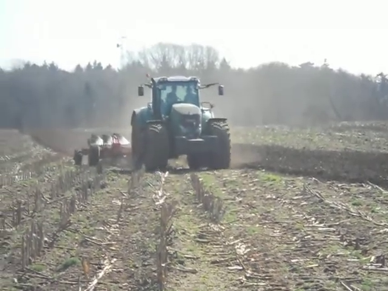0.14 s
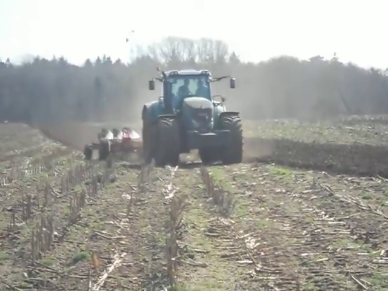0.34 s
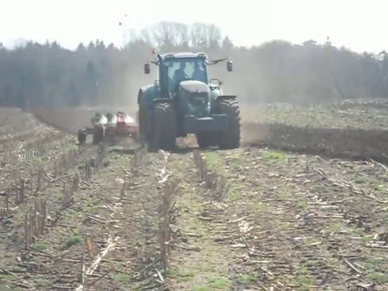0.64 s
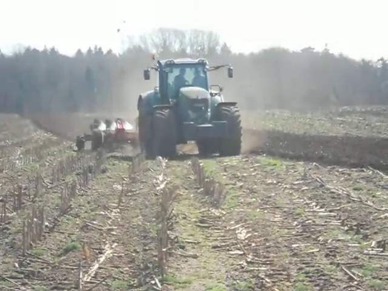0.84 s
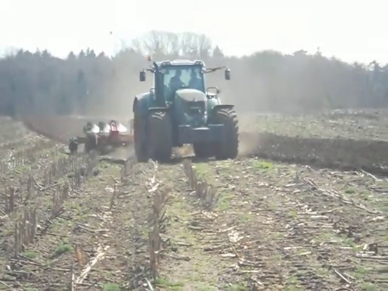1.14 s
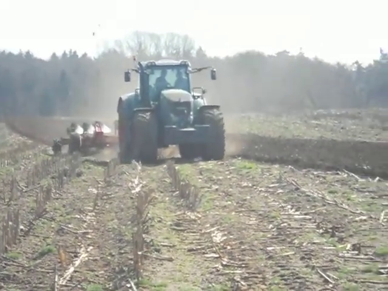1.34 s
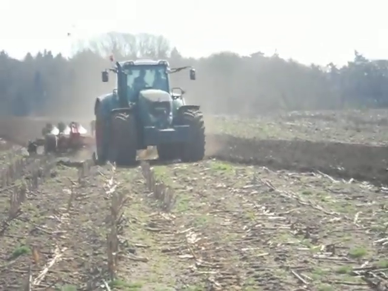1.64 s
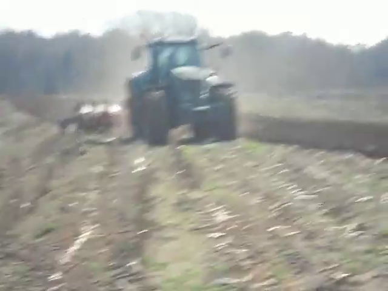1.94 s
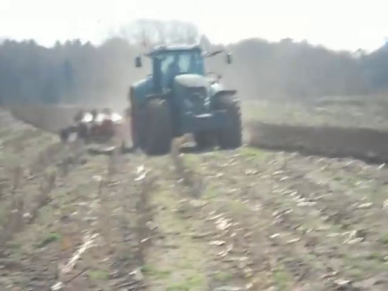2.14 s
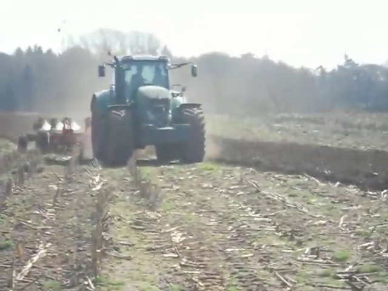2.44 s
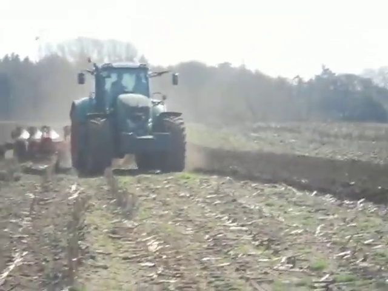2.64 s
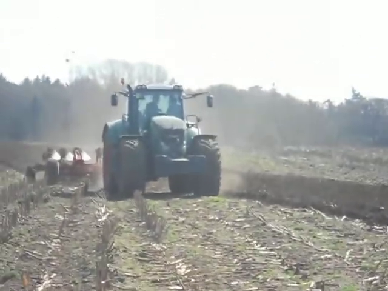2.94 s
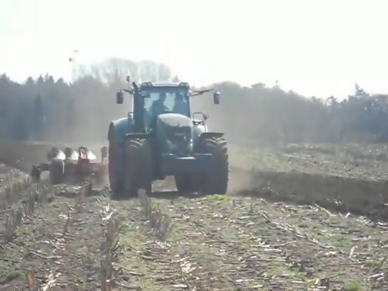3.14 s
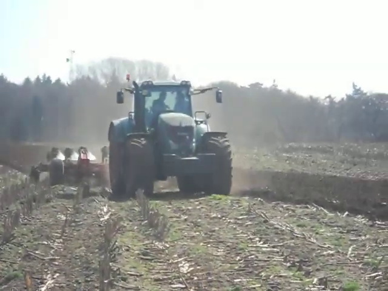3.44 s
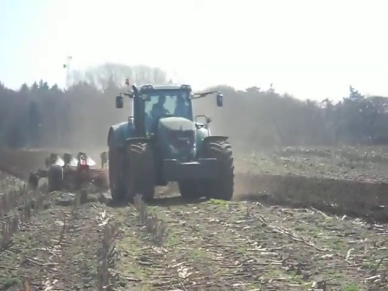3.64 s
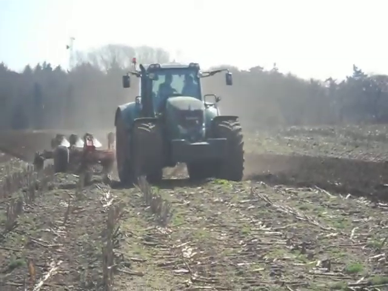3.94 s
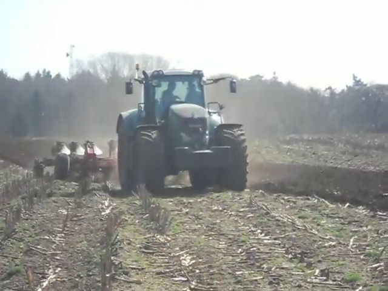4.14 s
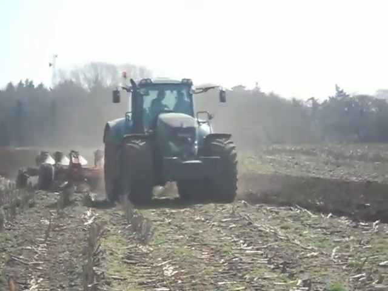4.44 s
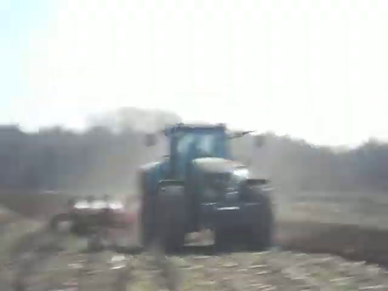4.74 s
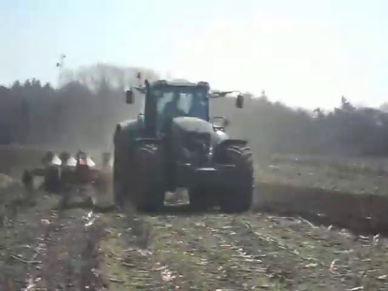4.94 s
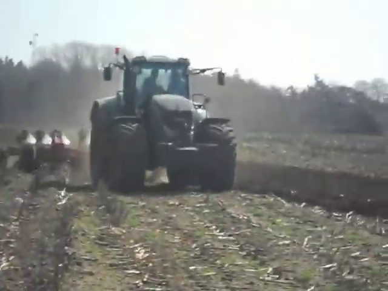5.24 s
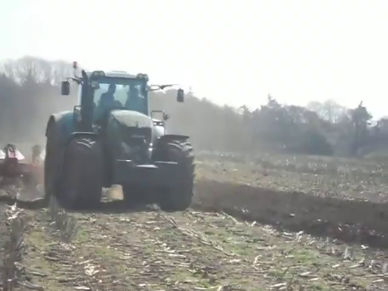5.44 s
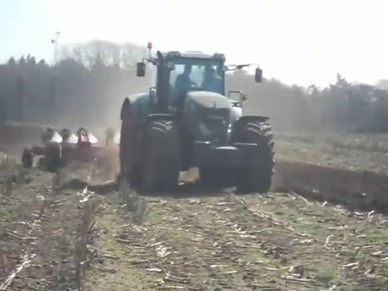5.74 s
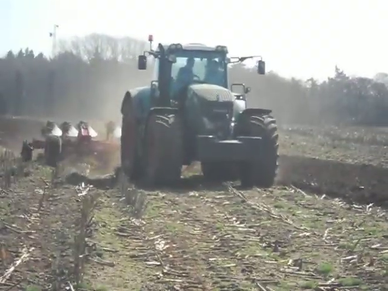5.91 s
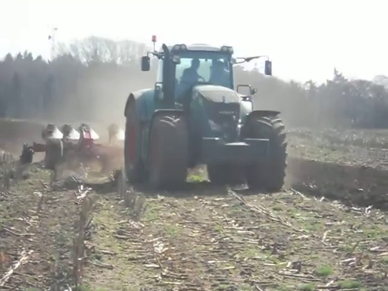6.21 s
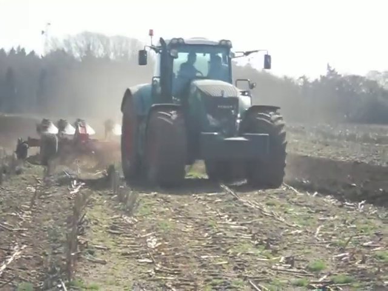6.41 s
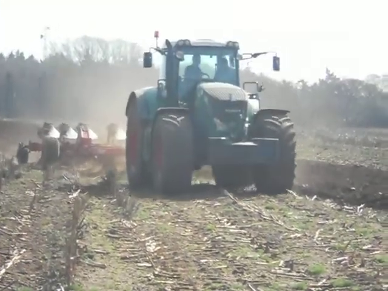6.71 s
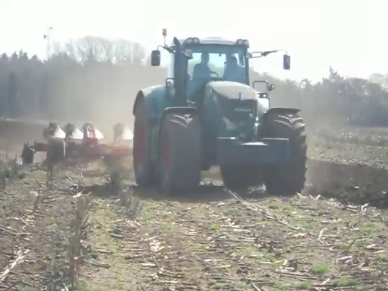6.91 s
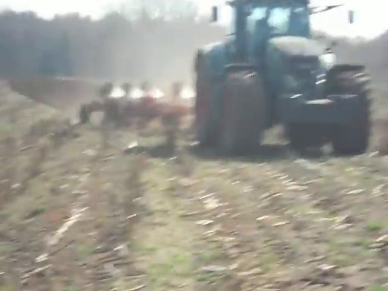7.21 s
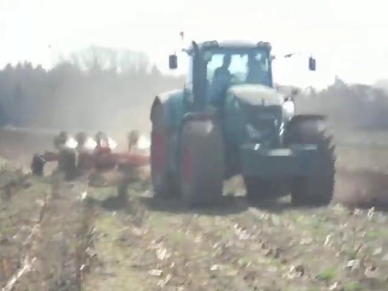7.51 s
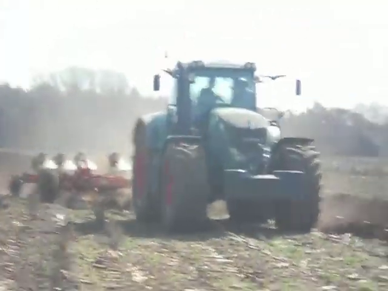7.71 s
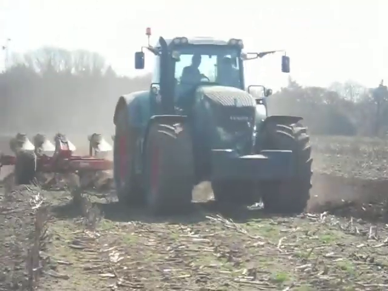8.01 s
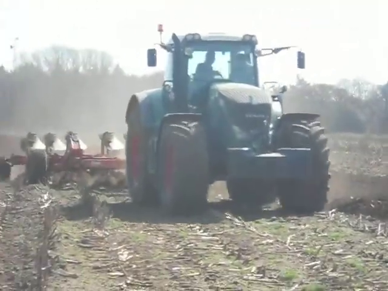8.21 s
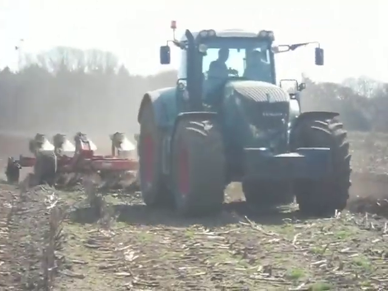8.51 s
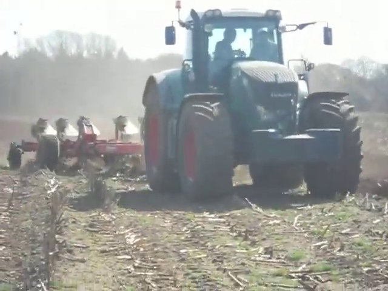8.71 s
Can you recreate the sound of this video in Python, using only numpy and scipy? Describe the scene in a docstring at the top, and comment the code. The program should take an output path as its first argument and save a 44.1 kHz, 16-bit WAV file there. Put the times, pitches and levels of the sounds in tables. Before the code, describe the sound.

Steady tractor engine drone and clatter, with gear whine and hissing earth, broken by wind thumps and a few dry ticks.

```python
"""A six-cylinder diesel tractor ploughs stubble towards the listener at about 1640 rpm.
From the start: exhaust drone at the firing rate, block clatter, gear whine, turbo whistle, soil hiss.
Near 1.8 s the hardest wind buffets hit the microphone, with dry ticks; the gain drops and swells back.
Weaker gusts follow from 3.5 to 5.5 s, while the whistle fades and the rig grows unevenly louder.
From 7 s a few more dry ticks sound close by."""
import sys
import numpy as np
from scipy import signal
from scipy.fft import rfft, irfft, next_fast_len
from scipy.io import wavfile
from scipy.ndimage import uniform_filter1d, minimum_filter1d

SR = 44100
rng = np.random.default_rng(int(sys.argv[2]) if len(sys.argv) > 2 else 0)


def store_wav(level_fs):
    """Save 16-bit WAV to argv[1]."""
    pcm = np.round(np.clip(np.atleast_2d(level_fs), -1, 1) * 32767)
    wavfile.write(sys.argv[1], SR, pcm.T.astype(np.int16))


N = 390726

# crank speed under load: t/s, speed/rpm
CRANK_SPEED = [(0, 1642), (0.6, 1634), (3.2, 1636), (4.5, 1641), (5.75, 1640), (6.6, 1633), (7.7, 1645),
               (8.4, 1632)]
# engine-locked lines: order (multiple of the four-stroke cycle rate), relative level/dB
EXHAUST_ORDERS = [(3, -18.5), (6, 0), (11, -22.5), (12, -18), (14, -19.5), (15, -17.5), (18, -23),
                  (19, -24), (20, -18.5), (22, -22), (24, -21)]
GEAR_ORDERS = [(26, -14), (28, -14.5), (30, -19), (31, -10.5), (33.1, -8), (38, -20.5), (42.2, -14),
               (53, -15), (62, -22), (90.3, -13), (93, -13), (95.4, -16.5), (102, -11), (120, -23.5)]
MESH_ORDERS = [(68.7, 0)]
# turbo whistles: f/Hz, wander width/Hz, relative level/dB
TURBO_WHISTLES = [(1980, 4.7, -18), (2610, 23, -36), (3120, 90, -14.5), (3984, 30, -8.5)]
# noise spectra: f/Hz, relative density/dB
BLOCK_SPECTRUM = [(60, 2), (110, 0.5), (220, 2), (340, -2.5), (490, -5.5), (570, -1.5), (740, -2.5),
                  (830, -6), (900, -9.5), (1000, -6.5), (1150, -3), (1270, -2), (1400, -5), (1540, -13),
                  (1900, -24)]
KNOCK_SPECTRUM = [(1200, 0.5), (1600, -8), (1760, -10), (1920, -8), (2250, -0.5), (2480, -0.5), (2620, 3.5),
                  (2740, -1), (2900, -4), (3600, -14), (5000, -49)]
INTAKE_SPECTRUM = [(1400, -18), (1750, -3), (1930, 6.5), (2200, -1.5), (2600, -9), (2900, -8.5),
                   (3200, -0.5), (3420, 1), (3800, 1), (4300, 1.5), (4850, 3.5), (5400, -0.5),
                   (6000, -16.5), (7700, -9), (9500, -23.5)]
SOIL_SPECTRUM = [(3500, -31), (5500, 1), (6200, 4), (7300, -0.5), (8500, -3.5), (10000, -5), (11000, -10),
                 (12500, -13.5)]
RUMBLE_SPECTRUM = [(12, -15), (22, 4.5), (50, 2.5), (90, -4.5), (180, -2), (300, -18), (600, -14.5)]
# approach of the rig: t/s, gain/dB
APPROACH_GAIN = [(0, -1.4), (1, -1.1), (1.5, -3.4), (3.2, -2.1), (4.2, 0.6), (5.1, -2.5), (6.5, 2.3),
                 (7.8, 2.5), (8.86, 1.2)]
# engine swell: t/s, drone gain/dB, knock gain/dB
ENGINE_SWELL = [(0, -3, -4), (1.5, -2, -3.5), (2.3, -3, 2), (3.2, 2, 1.5), (5.2, -1, -1), (6.5, 0.7, 0.2),
                (7.9, -1, -1), (8.86, -.3, -1)]
# turbo, clearest from afar: t/s, overall gain/dB, extra whistle gain/dB
TURBO_GAIN = [(0, 1.5, -3), (.35, 3, 4), (1.4, 3, 3), (2.6, 0.5, -3), (3.9, -0.5, -3), (5.5, 1.05, -13),
              (8.86, -1, -24)]
# transmission whine: t/s, level/dB
WHINE_LEVEL = [(0, -38.5), (1.5, -36.5), (2.4, -46.5), (4, -37.5), (5.5, -39.5), (6.6, -35.5), (7.9, -36),
               (8.86, -44)]
# gusts: t/s, half length/s, rumble level/dB, flutter level/dB
WIND_GUSTS = [(.25, 0.25, -24, -32.5), (1.963, .2, -15, -19), (3.5, 0.29, -32, -25),
              (4.315, 0.24, -22, -22.5), (5.33, 0.18, -26, -21.5)]
# hardest eddies: t/s, peak rms level/dB, half length/s, top f/Hz
WIND_BUFFETS = [(.435, -11.5, 0.0052, 256), (0.488, -13, 0.016, 90), (1.055, -11.5, 0.019, 100),
                (1.378, -14.5, .005, 330), (1.443, -7, 0.0053, 278), (1.718, -2.5, 0.013, 420),
                (1.76, -5, 0.019, 250), (1.789, 3, 0.0074, 477), (1.812, 4.5, 0.011, 280),
                (1.933, -1.5, 0.011, 260), (2.125, -5, 0.0026, 384), (2.21, -10, 0.024, 304),
                (3.48, -18, .015, 290), (3.79, -12.5, 0.0083, 274), (4.3, -13, .018, 221),
                (4.367, -5, 0.017, 272), (4.478, -8, 0.011, 350), (4.523, -5, 0.0065, 262),
                (4.617, -9.5, .015, 387), (5.21, -15, .005, 350), (5.345, -13, 0.0028, 400),
                (5.39, -15, .006, 375), (5.487, -12, 0.0072, 345)]
# nearby knocks, scrapes and snaps: t/s, peak level/dB, low f/Hz, high f/Hz, T60/s
DRY_TICKS = [(1.404, -21.5, 3200, 7500, 0.39), (1.732, -10.5, 1700, 6400, 0.0092),
             (1.783, 2.5, 680, 980, 0.011), (1.793, 0, 945, 1390, 0.0058), (1.803, 1, 750, 1080, 0.0081),
             (1.914, 3.5, 600, 5000, 0.0054), (1.932, -1.5, 2350, 7000, 0.011),
             (4.487, -6, 1300, 6000, 0.013), (7.056, -2.5, 1700, 9300, 0.0059),
             (7.2558, -7.5, 2200, 5500, 0.0091), (8.098, -10.5, 7500, 11000, 0.027),
             (8.538, -18, 5000, 9000, .05), (8.653, -18, 6000, 10500, 0.018)]
# microphone response: f/Hz, gain/dB
MIC_RESPONSE = [(0, -0.5), (10100, 0.5), (10500, -3), (10950, -14), (11700, -10.5), (12300, -22)]

CYLINDERS = 6
DRONE_DB, CLATTER_DB, KNOCK_DB, TURBO_DB, SOIL_DB, BREEZE_DB = -15.5, -28.5, -32, -34.5, -37.5, -35


def exhaust(cycles, level_db):
    """Steady firing tone; unequal cylinders add weaker, wavering lines."""
    firing = [(order, db) for order, db in EXHAUST_ORDERS if order == CYLINDERS]
    others = [(order, db) for order, db in EXHAUST_ORDERS if order != CYLINDERS]
    drone = order_lines(cycles, firing, wander_turns=0.004, waver_db=0.66)
    weak_lines = order_lines(cycles, others, wander_turns=0.066)
    return from_db(level_db) * (drone + weak_lines)


def engine(cycles, clatter_db, knock_db):
    """Firings shake block and head; gear lines sing through the clatter."""
    shaking = firing_noise(cycles, depth=0.16, uneven_db=0, surges=2)
    block = from_db(4) * coloured(shaking, BLOCK_SPECTRUM)
    gears = order_lines(cycles, GEAR_ORDERS, wander_turns=0.099)
    combustion = firing_noise(cycles, depth=0.1, uneven_db=0.4, surges=2)
    knock = coloured(combustion, KNOCK_SPECTRUM)
    return from_db(clatter_db) * (block + gears) + from_db(knock_db) * knock


def transmission(cycles):
    """The loaded gear mesh sings one wavering note."""
    level_db, = curves(WHINE_LEVEL)
    return from_db(level_db) * order_lines(cycles, MESH_ORDERS, wander_turns=0.2)


def turbo(cycles, level_db, whistle_db):
    """Rushing intake air; narrow whistles wander and flutter."""
    intake = firing_noise(cycles, depth=0.079, uneven_db=0.5, surges=1)
    air = from_db(2) * coloured(intake, INTAKE_SPECTRUM)
    whistles = np.zeros(N)
    for hz, width_hz, db in TURBO_WHISTLES:
        turns = np.cumsum(hz + width_hz / 2 * drift(25)) / SR
        flutter = from_db(2 * drift(45))
        whistles += from_db(db) * unit_rms(flutter * np.sin(2 * np.pi * turns))
    return from_db(level_db) * (air + from_db(whistle_db) * whistles)


def soil(level_db, crumbs_per_s=140, crumb_db=-12, surge_db=1):
    """Earth and stubble slide off the shares: fine hiss, sparse crumbs."""
    crumbs = (rng.random(N) < crumbs_per_s / SR) * rng.standard_normal(N)
    flow = rng.standard_normal(N) + from_db(crumb_db) * unit_rms(crumbs)
    return from_db(level_db + surge_db * drift(8.9)) * coloured(flow, SOIL_SPECTRUM)


def wind(lumpy_db=1.5):
    """Lumpy breeze rumble; gusts raise it and add a flutter of small eddies."""
    t = np.arange(N) / SR
    rumble_gain, flutter_gain = from_db(BREEZE_DB), 0
    for at_s, half_s, rumble_db, flutter_db in WIND_GUSTS:
        swell = bell(t - at_s, half_s)
        rumble_gain += from_db(rumble_db) * swell
        flutter_gain += from_db(flutter_db) * swell
    lumps = from_db(lumpy_db * drift(21))
    rumble = lumps * coloured(rng.standard_normal(N), RUMBLE_SPECTRUM)
    flutter = unit_rms(eddy_noise(N, low_hz=84, top_hz=314, roll_hz=148))
    return rumble_gain * rumble + flutter_gain * flutter


def buffets():
    """Short, hard eddies thump the microphone."""
    out, t = np.zeros(N), np.arange(-0.15, 0.15, 1 / SR)
    for at_s, db, half_s, top_hz in WIND_BUFFETS:
        eddy = bell(t, half_s) * eddy_noise(len(t), low_hz=0.22 * top_hz, top_hz=top_hz, roll_hz=139)
        add(out, at_s + t[0], from_db(db) * eddy / running_rms(eddy).max())
    return out


def ticks():
    """Brittle snaps: decaying bursts of band noise."""
    out, t = np.zeros(N), np.arange(0, 0.1, 1 / SR)
    for at_s, db, low_hz, high_hz, t60_s in DRY_TICKS:
        burst = rng.standard_normal(len(t)) * from_db(-60 * np.minimum(t / t60_s, 2))
        band = signal.butter(2, [low_hz, high_hz], "band", fs=SR, output="sos")
        snap = signal.sosfilt(band, burst)
        add(out, at_s, from_db(db) * snap / np.abs(snap).max())
    return out


def gain_control(x, ceiling_db=-11, attack_s=0.0017, hold_s=0.48, release_s=1.27):
    """Rms over the ceiling cuts the gain; it holds, then creeps back."""
    wanted_gain = np.minimum(from_db(ceiling_db) / running_rms(x), 1)
    size = int(hold_s * SR)
    held_cut = 1 - minimum_filter1d(wanted_gain, size, origin=(size - 1) // 2)
    release = np.exp(-np.arange(N) / SR / release_s)
    cut = np.maximum.accumulate(held_cut / release, axis=-1) * release
    pole = np.exp(-1 / (attack_s * SR))
    return x * (1 - signal.lfilter([1 - pole], [1, -pole], cut))


def order_lines(cycles, orders, wander_turns, waver_db=2):
    """Engine-locked partials; moving air varies their phase and level."""
    out = np.zeros(N)
    for order, db in orders:
        turns = order * cycles + rng.random() + wander_turns * drift(2.06)
        out += from_db(db + waver_db * drift(3.8)) * np.sqrt(2) * np.sin(2 * np.pi * turns)
    return out


def firing_noise(cycles, depth, uneven_db, surges):
    """Noise with `surges` peaks per firing; cylinder strengths spread by uneven_db."""
    firings = CYLINDERS * cycles
    strengths = from_db(uneven_db * rng.standard_normal(CYLINDERS))
    pulsing = np.exp(depth * np.cos(2 * np.pi * surges * firings))
    return rng.standard_normal(N) * strengths[firings.astype(int) % CYLINDERS] * pulsing


def eddy_noise(size, low_hz, top_hz, roll_hz):
    """Turbulent pressure: band noise, strongest in the bass."""
    band = signal.butter(3, [low_hz, top_hz], "band", fs=SR, output="sos")
    roll = signal.butter(1, roll_hz, fs=SR, output="sos")
    return signal.sosfilt(np.vstack([band, roll]), rng.standard_normal(size))


def coloured(x, spectrum):
    """Excitation shaped by a spectrum; unit rms."""
    hz, db = np.transpose(spectrum)
    size = next_fast_len(N)
    bins_hz = np.maximum(np.arange(size // 2 + 1) * SR / size, 1)
    gain = from_db(np.interp(np.log(bins_hz), np.log(hz), db, left=-np.inf, right=-np.inf))
    return unit_rms(irfft(rfft(x, size) * gain, size)[:N])


def drift(corner_hz):
    """Slow random wander, unit rms."""
    hop, settle = 40, 2000
    pole = np.exp(-2 * np.pi * corner_hz * hop / SR)
    noise = rng.standard_normal(N // hop + settle + 2)
    slow = signal.lfilter([1], [1, -2 * pole, pole * pole], noise)[settle:]
    return np.interp(np.arange(N) / hop, np.arange(len(slow)), unit_rms(slow))


def curves(table):
    """Columns of a time table, per sample."""
    times_s, *columns = np.transpose(table)
    return [np.interp(np.arange(N) / SR, times_s, column) for column in columns]


def running_rms(x, window_s=0.014):
    """Rms over a trailing window."""
    size = int(window_s * SR)
    power = uniform_filter1d(x ** 2, size, origin=(size - 1) // 2)
    return np.sqrt(np.maximum(power, 1e-12))


def bell(t, half_s):
    """Gaussian swell around t = 0."""
    return np.exp(-(t / half_s) ** 2 / 2)


def add(out, at_s, sound):
    """Mix a sound in from at_s."""
    start = int(np.clip(round(at_s * SR), 0, N))
    out[start:start + len(sound)] += sound[:N - start]


def unit_rms(x):
    """Scale to rms 1."""
    return x / np.sqrt(np.mean(x ** 2) + 1e-20)


def from_db(db):
    """Decibels to gain."""
    return 10 ** (db / 20)


def scene():
    """The rig in the open field; wind and ticks at the microphone."""
    rpm, = curves(CRANK_SPEED)
    cycles = np.cumsum(rpm / 60 / 2) / SR  # two crank turns per four-stroke cycle
    near_db, = curves(APPROACH_GAIN)
    drone_swell_db, knock_swell_db = curves(ENGINE_SWELL)
    turbo_swell_db, whistle_db = curves(TURBO_GAIN)
    rig = (exhaust(cycles, DRONE_DB + drone_swell_db)
           + engine(cycles, CLATTER_DB + 0.39 * near_db, KNOCK_DB + knock_swell_db + near_db)
           + transmission(cycles)
           + turbo(cycles, TURBO_DB + turbo_swell_db + near_db, whistle_db)
           + soil(SOIL_DB + near_db))
    return (rig + wind() + buffets() + ticks())[None]


def record(dry, clip_level=0.71, cutoff_hz=12200):
    """Gusts duck the gain, their first peaks clip softly; the treble falls away and is cut."""
    ducked = gain_control(dry)
    clipped = ducked / (1 + (ducked / clip_level) ** 8) ** (1 / 8)
    size = next_fast_len(N)
    bins_hz = np.arange(size // 2 + 1) * SR / size
    response = from_db(np.interp(bins_hz, *np.transpose(MIC_RESPONSE)))
    dulled = irfft(rfft(clipped, size) * response, size)[:, :N]
    lowpass = signal.ellip(10, 0.1, 90, cutoff_hz, fs=SR, output="sos")
    return signal.sosfilt(lowpass, dulled)


dry = scene()
out = record(dry)
store_wav(out)
```